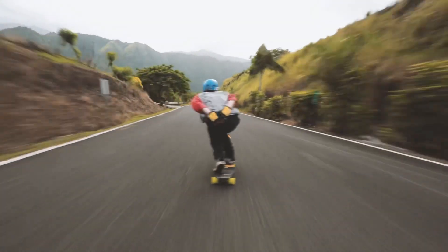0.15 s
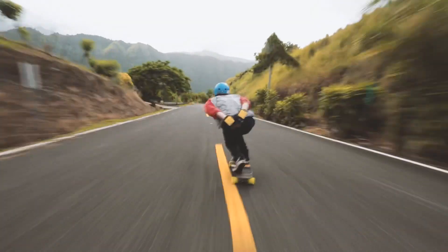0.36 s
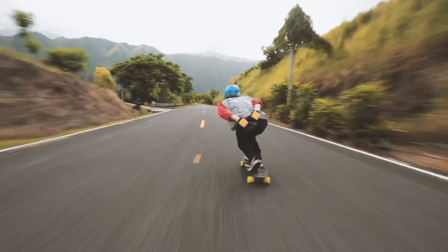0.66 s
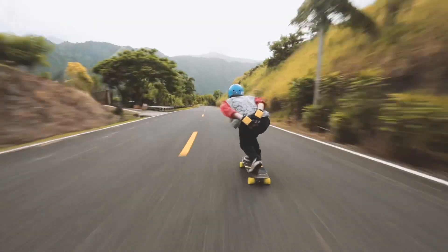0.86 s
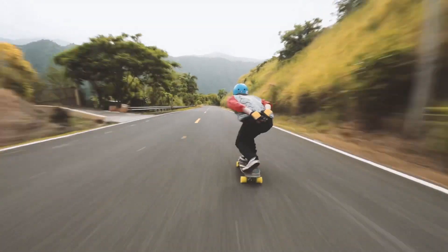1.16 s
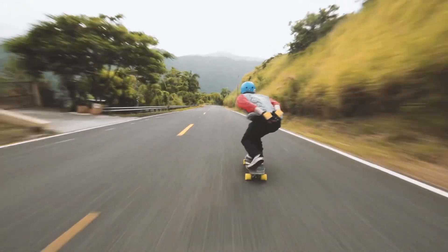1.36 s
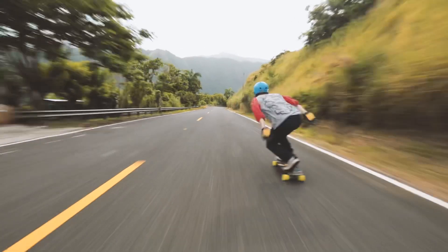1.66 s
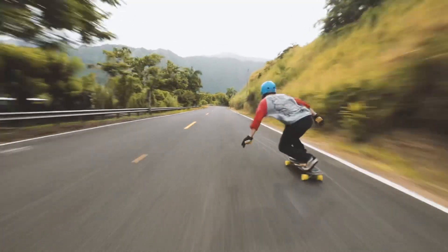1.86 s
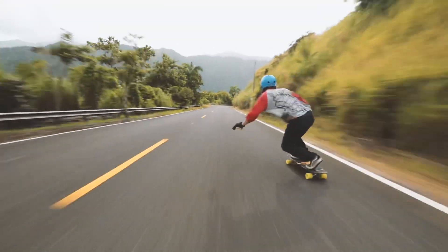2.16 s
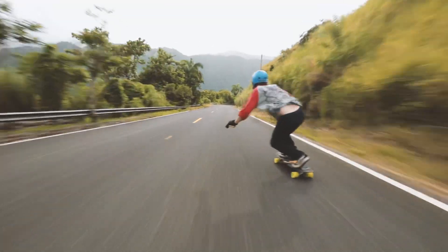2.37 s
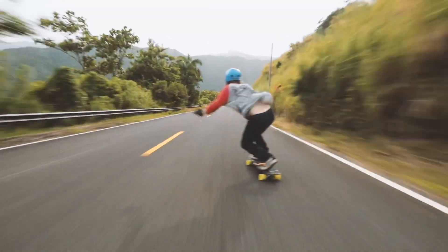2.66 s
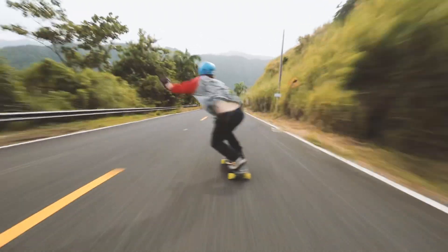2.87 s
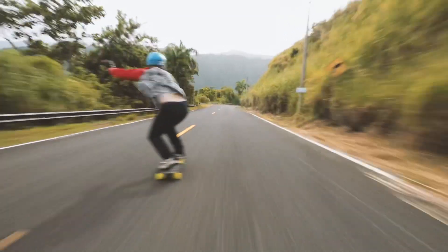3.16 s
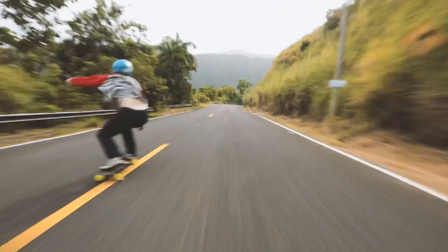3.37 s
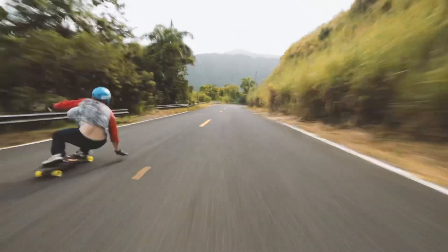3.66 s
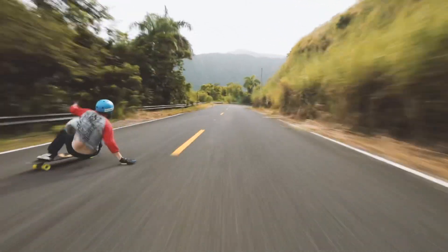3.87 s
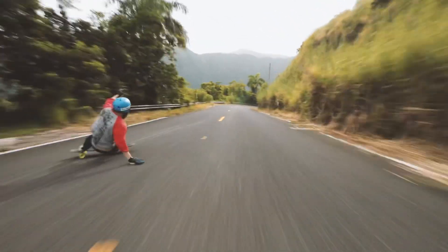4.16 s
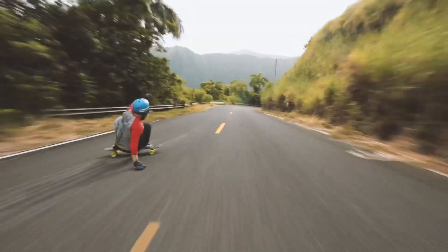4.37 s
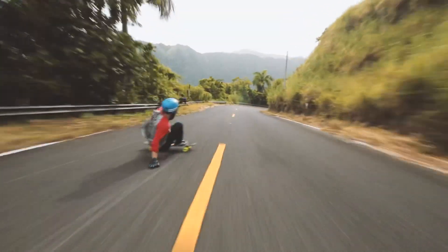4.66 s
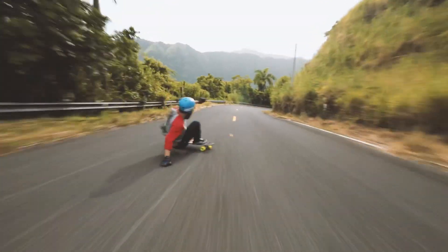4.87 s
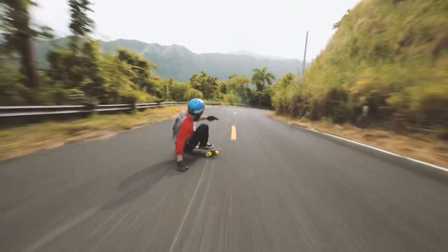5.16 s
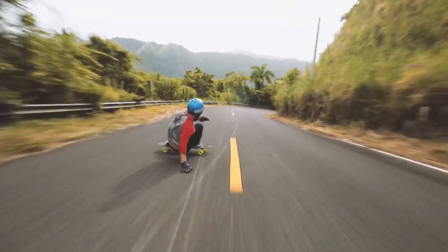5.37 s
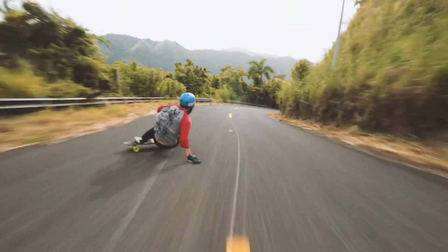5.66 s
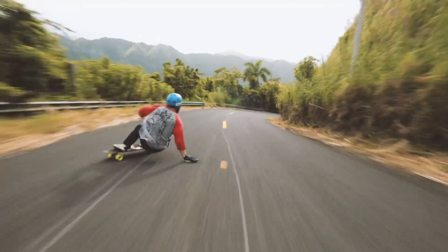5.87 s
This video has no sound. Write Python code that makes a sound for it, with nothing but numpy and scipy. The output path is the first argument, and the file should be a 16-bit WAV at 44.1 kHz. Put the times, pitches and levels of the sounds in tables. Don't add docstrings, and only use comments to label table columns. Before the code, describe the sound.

Wind thumps and flutters on a moving microphone over rough wheel roar, then longboard wheels break sideways into a hissing, squealing slide on asphalt.

```python
import sys
import numpy as np
from scipy import signal
from scipy.fft import rfft, irfft, next_fast_len
from scipy.io import wavfile
from scipy.ndimage import uniform_filter1d

SR = 44100
rng = np.random.default_rng(int(sys.argv[2]) if len(sys.argv) > 2 else 0)


def wav_out(sig):
    wavfile.write(sys.argv[1], SR, np.round(np.clip(np.atleast_2d(sig).T, -1, 1) * 32767).astype(np.int16))


def makeup_ratio(level_db):
    decades = np.asarray(level_db, float) / 20
    return 10 ** decades


N = 265482


def clock():
    return np.arange(N) / SR


def rms_one(x):
    return x / np.sqrt(np.mean(x ** 2) + 1e-20)


def in_time(rows):
    s, *columns = np.transpose(rows)
    return [makeup_ratio(np.interp(clock(), s, c)) for c in columns]


def at_hz(points, hz):
    table_hz, values = np.transpose(points)
    return np.interp(np.log(hz), np.log(table_hz), values)


def drift(rate):
    step = 40
    r = np.exp(-2 * step * np.pi * rate / SR)
    noise = rng.standard_normal(N // step + 2002)
    slow = signal.lfilter([1], [1, -2 * r, r * r], noise)[2000:]
    return np.interp(np.arange(N) / step, np.arange(len(slow)), rms_one(slow))


def grains(per_s, spread_db, smooth):
    size_db = spread_db * np.minimum(rng.exponential(1, (2, N)), 5)
    sizes = makeup_ratio(size_db) * rng.choice([-1, 1], (2, N))
    hits = rms_one(sizes * (rng.random((2, N)) < per_s / SR))
    return hits + smooth * rng.standard_normal((2, N))


def resonate(x, hz, width):
    r = np.exp(-np.pi * width / SR)
    feedback = [1, -2 * r * np.cos(2 * np.pi * hz / SR), r * r]
    return signal.lfilter((1 - r * r) / 2 * np.array([1, 0, -1]), feedback, x)


def resonate_twice(x, hz, width):
    return resonate(resonate(x, hz, width), hz, width)


def bands(source, colour, span_hz, count, patchy_db):
    edges = np.geomspace(*span_hz, count + 1)
    settle = 4000
    run_in = np.concatenate([source[:, -settle:], source], axis=1)
    out = 0
    for k, (low, high) in enumerate(zip(edges, edges[1:])):
        sos = signal.butter(2, [low, high], "band", fs=SR, output="sos")
        band = signal.sosfilt(sos, run_in)[:, settle:]
        level_db = at_hz(colour, np.sqrt(low * high)) + patchy_db * drift(17)
        out = out + band * makeup_ratio(level_db) * (-1) ** k
    return rms_one(out)


def evened(x, window_s, share):
    size = int(window_s * SR)
    power = uniform_filter1d(uniform_filter1d(x ** 2, size), size)
    return rms_one(x / (power + 1e-3) ** (np.clip(share, 0, 1) / 2))


def strikes(events, length_s, width_share):
    size = 600
    out, age = np.zeros((2, N)), np.arange(size) / (length_s * SR)
    bursts = rng.standard_normal((len(events), 2, size)) * age * np.exp(-age)
    for (s, db, hz), burst in zip(events, bursts):
        ring = resonate_twice(burst, hz, width_share * hz)
        start = round(s * SR)
        out[:, start:start + size] += makeup_ratio(db) * ring / np.abs(ring).max()
    return out


def driven(controls, events, layers, reach_oct):
    t = np.arange(0, N + 64, 64) / SR
    s, first, second = np.transpose(controls)
    at, half, swell_db, swell_hz = np.transpose(events)
    bumps = np.exp(-((t[:, None] - at) / half) ** 2)
    gains = []
    for hz, db, share, other in layers:
        level_db = db + np.interp(t, s, share * first + other * second)
        nearness = np.exp(-(np.log2(hz / swell_hz) / reach_oct) ** 2)
        level_db += bumps @ (swell_db * nearness)
        gains.append(np.interp(clock(), t, makeup_ratio(level_db)))
    return gains


def unlike(pair, gain):
    return np.array([pair[0], gain * pair[1]])


def ports(pair, side_db, lean_db, lag):
    size = next_fast_len(N)
    mid, twin = rfft(pair, size)
    hz = np.maximum(np.arange(len(mid)) * SR / size, 1)
    lean = np.tanh(at_hz(lean_db, hz) * np.log(10) / 40)
    rest = np.sqrt(np.maximum(makeup_ratio(at_hz(side_db, hz)) ** 2 - lean ** 2, 0))
    share = np.clip(at_hz(lag, hz), -1, 1)
    side = (lean + 1j * share * rest) * mid + np.sqrt(1 - share ** 2) * rest * twin
    return irfft(np.array([mid + side, mid - side]), size)[:, :N]


# f/Hz, level/dB [dB per Hz]
AIR_COLOUR = [(4500, -6), (8000, 7.5), (11000, -2), (13500, -9), (15800, -30)]


def distant_air():
    noise = rng.standard_normal((2, N))
    return makeup_ratio(-66.5) * bands(noise, AIR_COLOUR, (4500, 15800), count=4, patchy_db=4.0)


# f/Hz, level/dB [dB per Hz]
WIND_COLOUR = [(12, -35), (20, -12), (43, 4), (72, -1.5), (262, -14), (760, -26.5), (990, -63),
               (1670, -120)]
# t/s, level/dB
UNLIKE = [(0, -2.5), (.5, 2), (1.2, 1.5), (2.1, -5), (2.8, 2), (4, -2), (4.7, -8), (5.4, -1.5), (6.02, -9)]
# t/s, strength level/dB, fineness of the eddies level/dB
AIRFLOW = [(0, -4, 2), (0.5, 0.5, -1), (0.9, -1.8, -1), (1.25, 5, -1.5), (1.7, 2, 0), (2.1, 3.5, 0.2),
           (2.45, 3, 5.5), (2.8, 3.5, -4.4), (3.1, 2, -7), (3.33, 6.5, -1.5), (3.45, -0.3, 5),
           (3.8, -3.5, 9), (4.2, -2.0, 2.5), (4.6, -2, 2.9), (5, -6, 1), (5.4, -5.5, 2.5), (5.7, -9.5, 3.5),
           (6.02, -5.5, 1)]
# t/s, half-length t/s, change level/dB, eddy f/Hz
GUSTS_AND_LULLS = [(0.252, 0.0061, 6.5, 62.6), (0.362, 0.0093, 6, 85.0), (0.532, 0.017, 19.5, 45.0),
                   (0.894, 0.025, 14, 62.0), (0.916, 0.012, 20.5, 410.0), (1.121, 0.026, 8, 45.0),
                   (1.45, 0.035, 1.5, 160.0), (1.618, 0.017, 14.5, 85.0), (2.516, 0.019, 11, 45.0),
                   (2.83, 0.012, -4, 45.0), (2.831, 0.026, 11, 410.0), (3.677, 0.23, 4.5, 45.0),
                   (3.839, 0.027, 8, 45.0), (4.555, 0.023, 1.5, 45.0), (4.906, 0.026, 2.5, 160.0),
                   (5.295, 0.06, 7, 45.0), (5.412, 0.017, 21, 45.0), (5.77, 0.011, 10.5, 45.0),
                   (0.645, 0.025, 5, 161), (1.697, 0.04, 4.5, 170), (2.991, 0.062, 3.5, 270), (3.645, 0.058, 3, 199),
                   (5.416, 0.015, 12, 198), (1.89, 0.074, 3, 91), (1.474, 0.019, 5.5, 95), (2.698, 0.043, 0, 200),
                   (0.311, 0.015, -9, 408), (0.41, 0.024, -16, 220.0), (0.714, 0.041, -6, 220.0),
         (0.984, 0.019, -6.5, 62.0), (1.418, 0.035, -2, 45.0), (1.512, 0.038, -11, 560.0),
         (1.749, 0.027, -5, 45.0), (1.903, 0.025, -16, 45.0), (2.586, 0.024, -17.5, 62.0),
         (3.064, 0.0029, -11, 416), (3.293, 0.032, -10, 220.0), (3.412, 0.017, -11.5, 85.0),
         (5.276, 0.042, -6, 330), (2.22, 0.039, -1.5, 120), (3.968, 0.0063, 11.5, 45.0),
         (4.126, 0.027, -6.5, 220.0), (5.336, 0.0095, -19, 220.0), (5.805, 0.016, -13.5, 45.0)]
# f/Hz, mean level/dB, share of strength [1], share of fineness [1]
WIND_LAYERS = [(45, -22, 1, -0.46), (136, -23.5, 0.98, -0.035), (302, -32.5, 0.82, 0.48),
               (560, -40.5, 0.49, 0.89)]


def wind():
    buffet, flutter, rush, whoosh = driven(AIRFLOW, GUSTS_AND_LULLS, WIND_LAYERS, reach_oct=1.43)
    eddies = grains(per_s=250 * makeup_ratio(3 * drift(11)), spread_db=3.0, smooth=0.95)
    low = bands(eddies, WIND_COLOUR, (20, 85), count=6, patchy_db=-4.0)
    mid = bands(eddies, WIND_COLOUR, (85, 220), count=4, patchy_db=5.0)
    high = bands(eddies, WIND_COLOUR, (220, 420), count=2, patchy_db=0.1)
    top = bands(eddies, WIND_COLOUR, (420, 760), count=2, patchy_db=0.0)
    low = evened(low, window_s=0.072, share=0.6)
    mid = evened(mid, window_s=0.046, share=0.84)
    high = evened(high, window_s=0.11, share=0.38)
    top = evened(top, window_s=0.044, share=0.8)
    low = unlike(low, makeup_ratio(-4.5))
    gusty = makeup_ratio(4 * drift(9))
    flow = buffet * low + flutter * mid + rush * high + whoosh * top
    return unlike(flow, gusty * in_time(UNLIKE)[0])


# t/s, peak level/dB, f/Hz, push +1 or suck -1, excess on the left [-1..1]
SLAPS = [(0.258, -5, 75, 1, -0.078), (0.531, -12, 69.6, 1, 0.011), (0.91, -2, 70, -1, -0.022),
         (1.073, 0.5, 55.3, 1, -0.27), (1.17, -3, 55, 1, -0.21), (1.26, -6, 110, 1, -0.17),
         (1.615, -5, 90, 1, -0.12), (2.481, -6.5, 65, 1, -0.017), (2.653, -3.5, 75, 1, -0.053),
         (2.814, 2, 75.5, -1, -0.13), (3.025, -7.5, 60, 1, -0.054), (3.236, -1, 75, -1, -0.086),
         (5.412, -14, 59, 1, -0.14)]


def slapped(flow):
    out, calm = np.zeros((2, N)), np.ones(N)
    for s, db, hz, push, uneven in SLAPS:
        cycles = (clock() - s) * hz
        swing = np.exp(-(cycles / 0.45) ** 2) * np.cos(2 * np.pi * cycles)
        out += np.sign(push) * makeup_ratio(db) * swing * [[1], [4 * uneven]]
        calm *= 1 - .75 * np.exp(-(cycles / .9) ** 2)
    return out + calm * flow


# t/s, peak level/dB, f/Hz
SNAPS = [(0.04, -21, 533), (1.35, -32, 530), (1.562, -21, 587), (1.755, -26, 522), (1.823, -24, 568),
         (1.929, -24, 530), (1.951, -23, 657), (2.308, -24, 494), (2.396, -20.5, 576), (2.499, -25, 506),
         (2.807, -41, 630), (2.966, -31, 727), (3.518, -21, 501), (3.613, -18.5, 625)]


def snaps():
    return makeup_ratio(-4.0) * strikes(SNAPS, length_s=0.0022, width_share=1.04)


# t/s, nearness level/dB, grittiness level/dB
ROAD = [(0, 0.5, 0), (0.3, -0.5, 2.5), (0.55, 0.3, 5.5), (0.95, -1, 3), (1.1, 1.5, 0), (1.5, -0.5, 3.5),
        (1.9, -1.5, -2), (2.2, -1.5, -2.5), (2.5, 3, -2.5), (2.75, -1.5, 0.5), (3.1, 1, 2), (3.25, 3, -3),
        (3.7, 3, -1), (3.85, 8, -1), (4.2, 8.5, 3), (4.5, 2, 4.5), (5.5, 3, 6), (6.02, 3.5, 8)]
# t/s, half-length t/s, change level/dB, grain f/Hz
PATCHES = [(0.392, 0.0098, 5, 5000.0), (1.242, 0.027, 4, 1300.0), (1.805, 0.018, 5.5, 8500.0),
           (1.98, 0.025, 4.5, 980.0), (2.367, 0.05, 5.5, 8500.0), (2.59, 0.035, 5, 8500.0),
           (2.908, 0.056, 5.5, 5000.0), (2.76, .03, 2, 4500), (2.863, 0.026, 2, 4000), (2.983, .01, 7, 5000),
           (3.036, 0.019, 4.5, 6000), (3.128, 0.033, 8.5, 4700), (3.168, 0.011, 6, 4000),
           (0.464, 0.049, -3, 4000), (3.427, 0.063, 4.5, 3800.0),
           (0.147, 0.05, -5, 8500.0), (0.917, 0.012, -14, 8500.0), (1.046, 0.049, -3, 8500.0),
          (1.265, 0.058, -6.5, 8500.0), (2.065, 0.035, -3, 8500.0), (2.272, 0.02, -2, 8500.0),
          (2.678, 0.039, -2.5, 2200.0), (2.812, 0.017, -2.5, 3800.0), (2.96, 0.015, -11, 8500.0),
          (3.283, 0.02, -5, 8500.0), (4.879, 0.018, -8, 980.0), (5.53, 0.044, -3, 980.0),
          (5.715, 0.08, -6, 980.0), (5.847, 0.02, -9, 980.0)]
# f/Hz, mean level/dB, share of nearness [1], share of grittiness [1]
ROAD_LAYERS = [(980, -44, 0.78, .01), (1700, -46.5, 0.79, 0.5), (3530, -55.5, .01, 0.95),
               (8500, -63.5, .01, 1.2)]


def road_gains():
    return driven(ROAD, PATCHES, ROAD_LAYERS, reach_oct=1.3)


# f/Hz, level/dB [dB per Hz]
TREAD_COLOUR = [(828, -1), (982, -5), (1166, -1), (1380, -6.5), (1627, -14.5), (1920, -10.5), (2264, -20.5),
                (2670, -21)]
GROAN_S = (5.85, 5.92, 6.02)


def roar():
    surface = grains(per_s=1200 * makeup_ratio(2.2 * drift(20)), spread_db=3.5, smooth=1.0)
    groan = rms_one(resonate_twice(surface, hz=880, width=200))
    groan *= makeup_ratio(-41) * np.interp(clock(), GROAN_S, (0, 1, 0))
    drumming = bands(surface, TREAD_COLOUR, (760, 1270), count=3, patchy_db=1.04)
    return road_gains()[0] * drumming + groan


BREAK_LOOSE_S = 3.806


def sideways():
    rise_s = .012
    return np.clip((clock() - BREAK_LOOSE_S) / rise_s + 1, 0, 1)


# f/Hz, level/dB [dB per Hz]
GRIT_COLOUR = [(2400, -33.5), (2840, -17), (3630, -22.5), (7020, -27), (8310, -21), (15500, -53)]


def rolling():
    _, hum, grit, hiss = road_gains()
    stones = grains(per_s=2500 * makeup_ratio(1.7 * drift(36)), spread_db=3.5, smooth=1.0)
    stones = stones * makeup_ratio(0.99 * drift(25))
    tread = hum * bands(stones[:, ::-1], TREAD_COLOUR, (1270, 2900), count=5, patchy_db=0.5)
    tread += grit * bands(stones, GRIT_COLOUR, (2260, 5700), count=4, patchy_db=1.05)
    tread += hiss * bands(stones, GRIT_COLOUR, (5700, 15800), count=5, patchy_db=1.5)
    return (1 - 0.77 * sideways()) * tread


# t/s, peak level/dB, f/Hz
TICKS = [
    (0.3524, -44, 3680),
    (0.4033, -39.5, 3480),
    (0.4344, -44, 3720),
    (0.4934, -44, 2720),
    (0.6894, -54, 2810),
    (2.9776, -48, 2500),
]


def ticks():
    return makeup_ratio(9.5) * strikes(TICKS, length_s=0.0018, width_share=0.77)


# t/s, peak level/dB, f/Hz
CRACKLE = [(3.386, -46, 6800), (3.396, -45, 7500), (3.407, -56, 6500), (3.419, -47, 7460),
           (3.428, -37, 5170), (3.435, -59, 5600), (3.440, -40, 6850), (3.450, -45, 5500),
           (3.459, -45, 4500), (3.466, -39, 5500), (3.480, -44, 5000), (3.490, -51, 9600),
           (3.499, -43, 3300)]


def crackle():
    return makeup_ratio(5.5) * strikes(CRACKLE, length_s=.0022, width_share=.65)


def rubber(jerks, judder, modes, lag, share):
    rings = 0
    for k, (hz, width, db) in enumerate(modes):
        own = np.roll(jerks, lag + 41000 * k, axis=1)
        creep = (np.arange(N) + np.cumsum(.015 * drift(11.0))) % (N - 1)
        ring = [np.interp(creep, np.arange(N), port) for port in resonate_twice(own, hz, width)]
        rings = rings + makeup_ratio(db + 1.2 * drift(13.4)) * judder * np.array(ring)
    return evened(rings, window_s=0.11, share=share)


# f/Hz, level/dB [dB per Hz]
SLIDE_COLOUR = [(4350, -2.5), (4800, -6.5), (5400, -6.5), (5900, -13), (6480, -14), (8200, -6),
                (11900, -17.5), (15500, -34)]
# t/s, peak level/dB, f/Hz
SPRAY = [(3.803, -31, 6740), (3.966, -32, 8220), (4.0049, -34, 6490), (4.0453, -26, 5090),
         (4.0757, -38, 5150), (4.1281, -42, 5000), (4.1371, -32, 6840), (4.1585, -35, 5000),
         (4.2279, -40, 6330), (4.3022, -39, 5070), (4.4104, -45, 7680)]


def spray(jerks, scrub, hiss):
    sharp = (hiss * scrub) ** .5
    out = -hiss * bands(jerks, SLIDE_COLOUR, (3900, 5700), count=3, patchy_db=3.0)
    out += makeup_ratio(-18.0) * scrub * bands(jerks, SLIDE_COLOUR, (5700, 7300), count=2, patchy_db=-1.5)
    out += makeup_ratio(-8.5) * sharp * bands(jerks, SLIDE_COLOUR, (7300, 15800), count=4, patchy_db=2.4)
    return out + makeup_ratio(-1.0) * strikes(SPRAY, length_s=0.00071, width_share=0.65)


# f/Hz, width f/Hz, level/dB
SQUEAL = [(1380, 200, 0), (1520, 260, -1.5), (1680, 300, -4)]
LIP = [(1760, 330, 0), (1910, 260, 0), (2100, 330, -3)]
# t/s, peak level/dB, f/Hz
SLIPS = [
    (3.8073, -26, 2070),
    (3.8547, -21.5, 1910),
    (4.0133, -25, 1900),
    (4.048, -23, 2300),
    (3.853, -23, 2860),
    (4.1252, -26, 2690),
    (4.1839, -22, 1940),
    (4.2793, -34, 1760),
    (4.411, -34, 1820),
]


def squealing(loose, judder, squeal, lip):
    out = squeal * rubber(loose, judder, SQUEAL, lag=17000, share=0.27)
    out += lip * rubber(loose, judder, LIP, lag=29000, share=0.96)
    return out + makeup_ratio(1.0) * strikes(SLIPS, length_s=0.0023, width_share=0.34)


# f/Hz, width f/Hz, level/dB
FAST_EDGE = [(3450, 650, 1), (4500, 630, -6)]
SLOW_EDGE = [(3790, 970, 0)]
SLOWING_S = (4.55, 4.9)


def edge_ringing(loose, judder, scrub, hiss):
    slowed = np.interp(clock(), SLOWING_S, (0, 1))
    fast = rubber(loose, judder, FAST_EDGE, lag=4100, share=0.3)
    slow = rubber(loose, judder, SLOW_EDGE, lag=21000, share=0.29)
    return makeup_ratio(-9.0) * (1 - slowed) * scrub * fast + makeup_ratio(3.0) * slowed * hiss * slow


# f/Hz, width f/Hz, level/dB
SCRUB = [(2430, 580, 0.75), (2800, 590, 0.83), (3100, 530, -2)]
# t/s, left minus right level/dB
SCRUB_PAN = [(3.8, 1), (4.55, -1), (5.02, -7), (5.91, -13.5), (6.02, -6)]
# t/s, sideways load level/dB, grip of the rubber level/dB
SLIDE_FORCE = [(3.8, 6.5, 1.7), (4.2, 6, -1.2), (4.45, -0.5, 1), (4.8, -0.5, -2), (5.1, -1, 5.5),
               (5.35, -0.5, 1), (5.5, -8, 1.5), (5.72, -3, 3), (6.02, -3.5, -11.5)]
# t/s, half-length t/s, change level/dB, f/Hz
GRABS = [(3.848, 0.03, 4.5, 2190), (3.928, 0.024, -10, 1900.0), (4.26, 0.031, -1.5, 2160),
         (4.43, 0.05, -4, 4500.0), (4.55, 0.046, 5.5, 1700.0), (4.653, 0.024, 2.5, 2900.0),
         (5.192, 0.035, -9, 3460), (5.34, 0.035, 9, 1400.0), (5.48, 0.015, -5, 1700.0),
         (5.667, 0.039, 5, 4500.0), (5.786, 0.032, 7, 3400.0), (5.81, 0.08, -3, 1390),
         (3.902, 0.14, -0.5, 4500), (4.095, .1, -1, 4700), (4.343, 0.067, 2, 3100), (4.6, 0.17, 1.5, 2900),
         (4.9, 0.27, 2, 4300), (3.88, .04, 3, 9000), (4.305, .012, -7, 4500), (4.032, 0.021, -3, 4500),
         (5.504, .05, 3, 2800), (5.544, 0.027, 2, 1400), (5.053, 0.045, 1.5, 1600), (5.25, .03, 3.5, 1700),
         (5.682, 0.025, 3.5, 1450), (5.991, 0.018, 6.5, 4500.0), (5.998, 0.02, 6.5, 1700.0)]
# f/Hz, mean level/dB, share of load [1], share of grip [1]
SLIDE_LAYERS = [(1450, -40, .01, 1), (1900, -41.5, 0.46, 0.11), (2820, -47, 1.26, .01),
                (4500, -56, 0.61, .4)]
# f/Hz, level/dB
SLIDE_SIDE = [(500, -9), (770, -16.5), (1170, -41), (2740, -23.5), (4190, -11.5), (6410, -2), (9810, -20),
              (15000, 5)]
# f/Hz, level/dB
SLIDE_LEAN = [(700, -2), (1650, 0.8), (3000, 0.5), (5000, -1), (8000, 6.5), (13000, -7)]
# f/Hz, share [-1..1]
SLIDE_LAG = [(1000, .05), (2400, -0.76), (3400, 0.048), (5900, 0.36), (7700, .1), (13200, 0.57)]


def sliding(road):
    squeal, lip, scrub, hiss = driven(SLIDE_FORCE, GRABS, SLIDE_LAYERS, reach_oct=0.41)
    hiss = hiss * np.clip((clock() - BREAK_LOOSE_S) / .04 + 0.39, 0, 1)
    loose = grains(per_s=3800, spread_db=4.6, smooth=1.2)
    judder = makeup_ratio(0.7 * drift(26))
    out = spray(judder * loose, scrub, hiss)
    out += squealing(loose, judder, squeal, lip)
    out += edge_ringing(loose, judder, scrub, hiss)
    scrubbing = sideways() * scrub * rubber(loose, judder, SCRUB, lag=9000, share=0.55)
    scrubbing = ports(scrubbing, SLIDE_SIDE, SLIDE_LEAN, SLIDE_LAG)
    across = in_time(SCRUB_PAN)[0] ** .5
    ahead = ports(sideways() * out + road, SLIDE_SIDE, SLIDE_LEAN, SLIDE_LAG)
    return ahead + scrubbing * [across, 1 / across]


CENTRED_S = (2.5, 3.9)
# f/Hz, level/dB
ROLL_SIDE = [(60, -3.5), (210, -13), (1500, -14.5), (2740, -6), (4190, -9), (6410, -2), (9810, -12.5),
             (15000, 4)]
# f/Hz, level/dB
ROLL_LEAN = [(60, -2), (180, -2.0), (550, -1.5), (1650, -3), (15000, -1)]
# f/Hz, share [-1..1]
ROLL_LAG = [(60, -0.23), (1800, -0.16), (3200, .6), (4200, -.1), (6500, .8), (9000, .05)]


def scene():
    road = roar()
    centred = np.interp(clock(), CENTRED_S, (0, 1))
    around = distant_air() + slapped(wind()) + snaps()
    around += rolling() + ticks() + crackle() + (1 - centred) * road
    return ports(around, ROLL_SIDE, ROLL_LEAN, ROLL_LAG) + sliding(centred * road)


def roll_off(x):
    return signal.sosfilt(signal.butter(12, 15620, fs=SR, output="sos"), x)


def record(dry):
    knee, top = .6, .99
    room = top - knee
    over = np.maximum(np.abs(dry) - knee, 0)
    rounded = dry - np.sign(dry) * (over - room * np.tanh(over / room))
    mix = np.clip(rounded, -.995, .995)
    return roll_off(mix)


dry = scene()
out = record(dry)
wav_out(out)
```